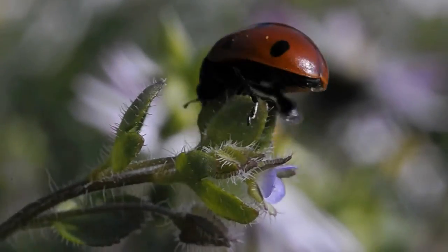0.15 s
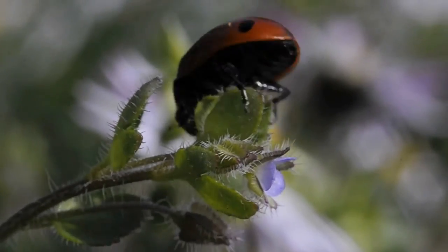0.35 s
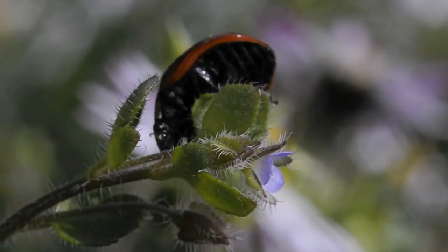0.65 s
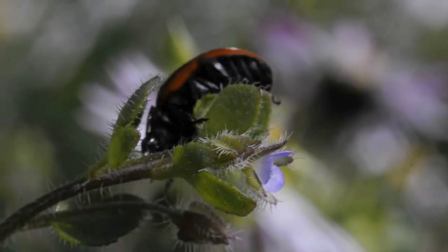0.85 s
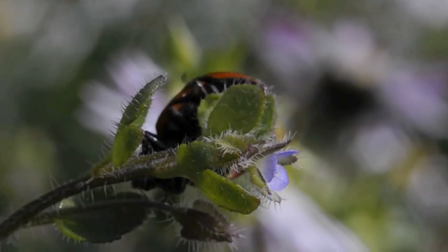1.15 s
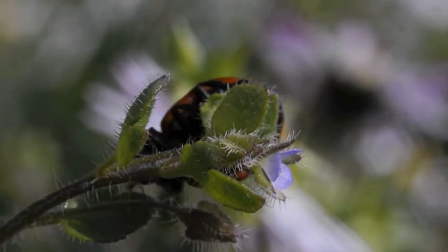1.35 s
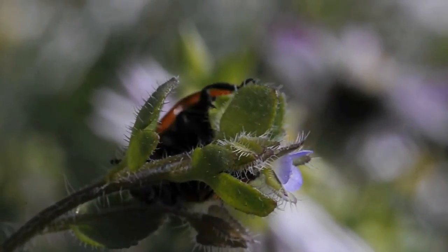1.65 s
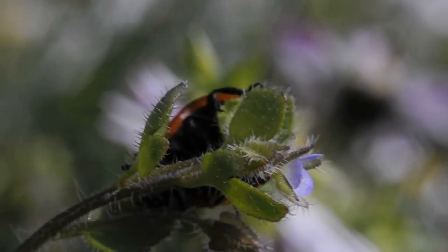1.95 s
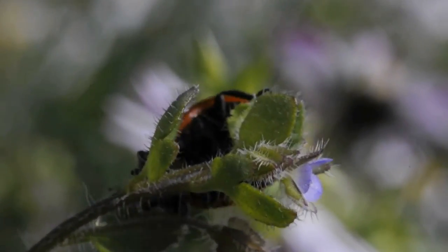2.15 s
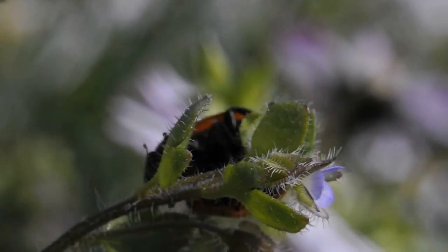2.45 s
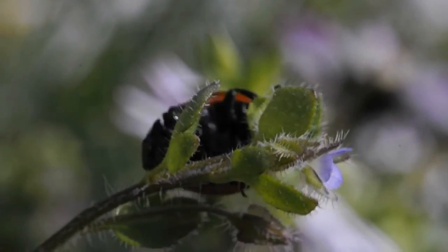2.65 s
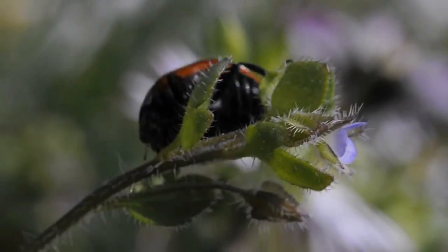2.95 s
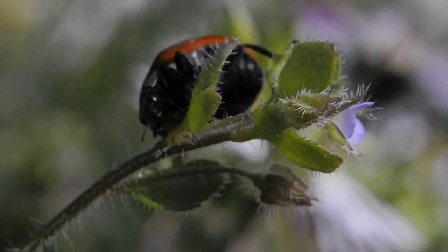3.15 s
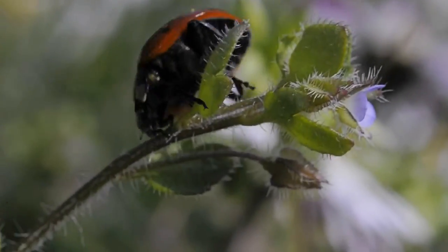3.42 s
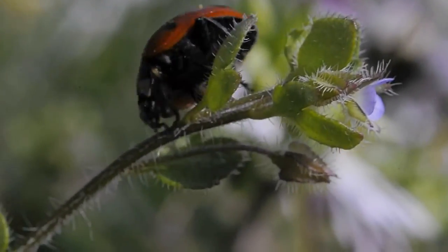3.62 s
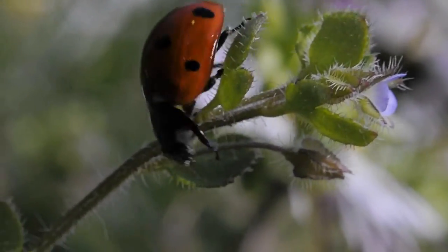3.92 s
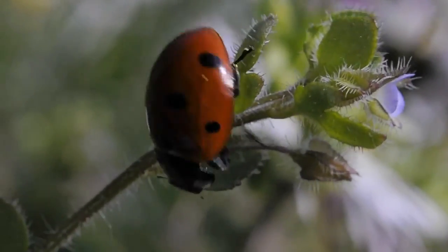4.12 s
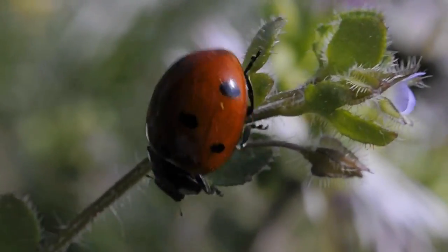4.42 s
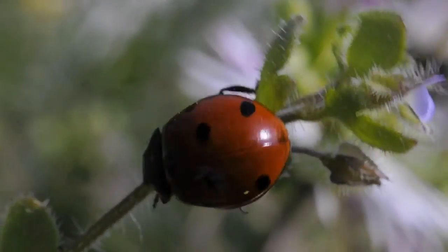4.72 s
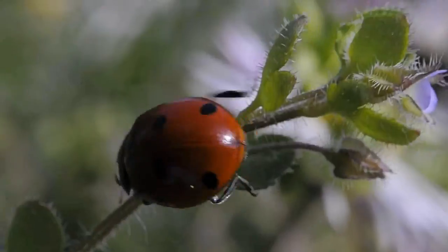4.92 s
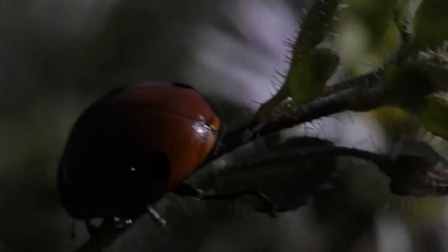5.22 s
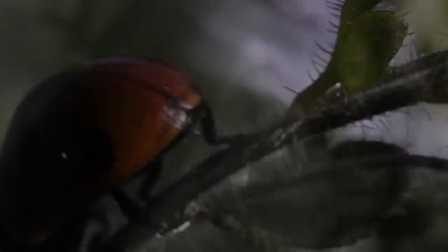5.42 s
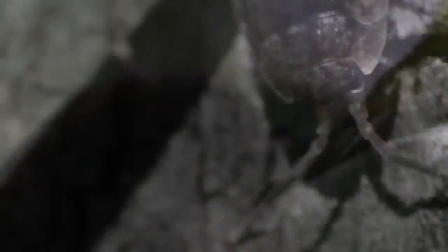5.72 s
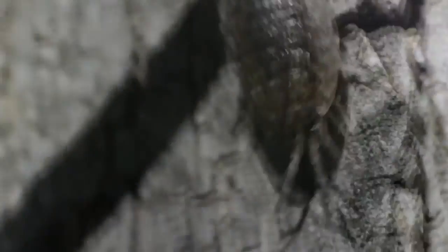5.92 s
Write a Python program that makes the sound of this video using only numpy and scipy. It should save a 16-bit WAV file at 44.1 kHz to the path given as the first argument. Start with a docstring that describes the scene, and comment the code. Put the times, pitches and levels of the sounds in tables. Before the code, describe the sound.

A soft, distant outdoor hush runs throughout, heard from one microphone among trees. At 0.5 seconds a single songbird starts with fluted, gliding whistles, echoing lightly off trunks and foliage. A sharp, dry snap sounds close by at 0.7 seconds. The bird slides upward through a buzzing slur around 0.9, gives a clear falling whistle at 1.2, then breaks into a thin, high twitter from 1.7 to 2.3, with small snaps near its end. The second phrase begins at 2.8 seconds: short whistles, a louder climbing warble from 3.2 to 3.5, more whistles until 4.2, then a quick, slightly raspy trill around 4.4 and twittering until 4.9. Faint, grainy rustles of vegetation come and go nearby, with a dull snap at about 4.1. One faint rising note follows at 5.3 seconds, and a last snap at 5.8.

```python
"""One microphone among trees, over a soft, distant hush. Half a second in, a songbird starts with
fluted whistles, thrown back by trunks and foliage; small snaps and rustles come and go close by.
The first phrase runs through a buzzing slur to a thin twitter, sung with both sides of the syrinx.
Near 2.8 s the second begins: whistles, a climbing warble, more whistles, then a quick trill and
twitter. One faint rising note and a last snap follow."""
import sys
import numpy as np
from scipy import signal
from scipy.fft import rfft, irfft
from scipy.io import wavfile
from scipy.ndimage import uniform_filter1d

SR = 44100
rng = np.random.default_rng(int(sys.argv[2]) if len(sys.argv) > 2 else 0)


def put_to_file(sound):
    """Save the sound as 16-bit audio at rate SR, in the file named by the first command-line argument."""
    columns = np.atleast_2d(sound).T  # one column per channel
    safe = np.clip(columns, -1, 1)
    whole_steps = np.round(safe * 32767)
    wavfile.write(sys.argv[1], SR, whole_steps.astype(np.int16))


N = 267687

# spectrum of the distant wash: (frequency [Hz], relative level [dB])
HUSH_SPECTRUM = [(18, -46), (30, -23.5), (75, -20.5), (263, -16.5), (324, -8.5), (359, -10.5), (410, -6.5),
                 (787, 0), (1770, -7), (2130, -9.5), (15500, -15.5)]
# fluted notes: (time [s], length [s], pitch [Hz], drift [share of pitch], scoop [share of pitch],
# fall [share of pitch], fall time [s], level [dB], push before the fall [dB], overtone gain [dB])
WHISTLE_NOTES = [ (0.506, 0.092, 1870, -0.065, 0, 0.33, 0.015, -31, 5, -37),
                 (.589, 0.13, 1933, 0.095, .26, 0.203, 0.034, -25, -4, -38),
                 (1.212, 0.19, 2237, -.075, 0.13, .31, 0.026, -20.5, -0.5, -39),
                 (1.393, 0.18, 1447, 0.058, -.09, -0.055, 0.017, -42, 5, -22),
                 (2.767, 0.079, 1655, 0.047, 0, 0.107, 0.0177, -34, 2, -30.5),
                 (2.824, 0.047, 1460, -0.07, -0.061, -0.0057, 0.018, -31.5, 8, -42),
                 (2.855, 0.11, 1440, -0.0018, 0, 0.02, 0.019, -44.5, -10, -19),
                 (2.966, 0.031, 1394, -0.069, 0.014, 0.053, 0.01, -30, 2.5, -36),
                 (3.066, 0.073, 2030, 0.042, .2, 0.15, 0.012, -23.5, 2.5, -36.5),
                 (3.744, 0.046, 1628, -0.046, 0, 0.18, 0.0073, -40.5, 5, -19.5),
                 (3.764, 0.091, 2433, -0.053, -0.038, 0.18, 0.016, -31.5, -2, -24.5),
                 (3.84, 0.067, 1640, 0, 0.012, -0.064, 0.0075, -27, 3, -32.5),
                 (3.962, 0.17, 1769, 0.1, -0.085, -0.17, 0.033, -26, 1.5, -32.5),
                 (4.115, 0.1047, 2586, -.015, 0.3, 0.11, 0.0084, -24, 8, -29.5),
                 (5.256, .055, 2910, 0.48, 0.047, -0.041, 0.019, -45, 3, -40), ]
# how the beak colours the overtones: (frequency [Hz], gain [dB])
BEAK_RESPONSE = [(3000, 13), (4000, 6), (5200, 2.5), (6600, 3), (7500, -12), (8500, 7), (9300, -4),
                 (10400, 8), (11700, 1), (13000, -5), (16000, -9)]
# scatter from the foliage: (frequency [Hz], time to fall 60 dB [s])
FOLIAGE_DECAY = [(500, 0.17), (2000, 0.59), (4000, 0.57), (8000, 0.22), (14000, 0.033)]
# snaps near the microphone: (time [s], peak level [dB], treble tilt [dB])
NEAR_SNAPS = [(.7105, -5.5, 16.5), (.906, -23.5, -31), (.924, -23.5, -23), (2.193, -16, 39),
              (2.238, -22.5, 20), (4.146, -25, -17), (5.228, -36, 16), (5.842, -19.5, 26)]
# spectrum of a snap before its tilt: (frequency [Hz], relative level [dB])
SNAP_SPECTRUM = [(100, -41), (380, -19), (550, 9.5), (800, 14.5), (1200, 9.5), (2400, -3), (3500, -3),
                 (5000, -12.5), (15500, -19.5)]
# nearby rustling: (peak time [s], fade time [s], dull level [dB], crisp level [dB])
RUSTLE_SWELLS = [(0.717, 0.01, -55, -33.5), (.815, 0.075, -47, -39), (0.898, 0.037, -38, -47.5),
                 (1.3, 0.17, -48, -48), (1.89, 0.04, -41.5, -61), (3.05, 0.15, -49, -47.5),
                 (3.421, .2, -52, -49), (4.152, 0.12, -39.5, -44), (4.5, 0.19, -60, -41.5),
                 (5.08, 0.45, -52.5, -70), (5.29, 0.21, -55, -50.5)]
# dull part of the rustle: (frequency [Hz], relative level [dB])
DULL_SPECTRUM = [(100, -33), (300, -8.5), (500, -4), (900, 1.5), (1500, -2), (3000, -7), (8000, -59)]
# crisp part of the rustle, also the twitter's rasp: (frequency [Hz], relative level [dB])
CRISP_SPECTRUM = [(300, -13), (1500, -5), (3500, 3), (5500, -3.5), (8000, -3), (11000, -2), (15500, -5.5)]
# course of the buzzing slur: (time [s], top pitch [Hz], level [dB])
BUZZ_CONTOUR = [(0.828, 2374, -20), (0.851, 2330, -20), (0.873, 2070, -17), (0.889, 2283, -25.5),
                (0.941, 2532, -24.5), (0.961, 3020, -22.5), (0.985, 3260, -27.5), (1.024, 3323, -22.5),
                (1.052, 3324, -37)]
# twitter, higher side of the syrinx:
# (time [s], length [s], rise time [s], first pitch [Hz], top pitch [Hz], level [dB], swell [dB])
UPSWEEP_NOTES = [ (1.734, 0.03, .015, 2670, 8800, -34.5, -1), (1.766, 0.02, 0.0084, 4730, 8230, -34.5, 12),
                 (1.787, 0.032, 0.0074, 4520, 7960, -34, 4), (1.814, 0.02, .008, 4700, 8000, -41, -5),
                 (1.897, 0.097, 0.016, 6000, 8280, -41.5, 2), (1.993, 0.073, 0.0093, 3820, 7890, -39.5, -5),
                 (2.11, 0.064, 0.0053, 8100, 8500, -41, 12), (2.18, 0.071, 0.011, 5450, 8270, -40, -4),
                 (4.639, 0.085, 0.023, 4720, 6370, -34, 2), (4.893, 0.038, 0.0077, 3870, 6550, -38.5, -4), ]
# twitter, lower side: (time [s], length [s], first pitch [Hz], last pitch [Hz], level [dB])
CHIP_NOTES = [ (1.749, 0.029, 2310, 3120, -35), (1.769, 0.028, 4264, 2870, -30),
              (1.791, 0.0192, 3850, 2856, -31.5), (1.803, 0.0145, 4170, 2990, -34),
              (1.904, .031, 4120, 3260, -27.5), (1.934, 0.014, 3990, 3335, -27.5),
              (1.951, 0.01, 3570, 3140, -30.5), (2.008, 0.024, 4026, 3220, -29),
              (2.035, 0.0226, 3900, 3190, -33), (4.353, .022, 4640, 2960, -31.5),
              (4.681, 0.043, 4300, 3600, -34.5), (4.707, 0.037, 3820, 3546, -23.5),
              (4.877, 0.037, 3600, 3890, -38.5), ]
# downstrokes of the trill: (time [s], level [dB], end pitch [Hz])
TRILL_STROKES = [(4.368, -23.5, 3980), (4.405, -21, 4080), (4.442, -22.5, 3960), (4.477, -21.5, 3990),
                 (4.514, -25, 3817), (4.550, -29.5, 3645)]

BAND_LIMIT_HZ = 15900


def amp(db):
    """Decibels to gain."""
    return 10 ** (np.asarray(db) / 20)


def unit(x):
    """Scales to an rms of one."""
    return x / np.sqrt(np.mean(x ** 2) + 1e-20)


def read(points, hz):
    """Reads a curve on a log-frequency axis."""
    f, value = np.transpose(points)
    return np.interp(np.log(hz + 1), np.log(f + 1), value)


def add(mix, start, sound):
    """Mixes a sound in at start seconds."""
    part = mix[max(round(start * SR), 0):][:len(sound)]
    part += sound[:len(part)]


def noise(spectrum):
    """Noise with the given spectrum and an rms of one."""
    gain = amp(read(spectrum, np.fft.rfftfreq(N, 1 / SR)))
    return unit(irfft(rfft(rng.standard_normal(N)) * gain, N))


def wander(n, rate):
    """A smooth random curve that changes about rate times a second."""
    steps = np.arange(n) * rate / SR
    count = int(steps[-1]) + 2
    return np.interp(steps, np.arange(count), rng.standard_normal(count))


def hush(wash_db=-46.5, hum_hz=335, hum_db=-69):
    """The bed of the place: a distant outdoor wash with a faint wavering hum."""
    hz = hum_hz * (1 + .04 * wander(N, 60))
    hum = np.sin(2 * np.pi * np.cumsum(hz) / SR) * (1 + .5 * wander(N, 20))
    return amp(wash_db) * noise(HUSH_SPECTRUM) + amp(hum_db) * unit(hum)


def note(length, attack_s=0.0077, release_s=0.0071, ends_db=-14):
    """Time axis of a long note, and its fade in and out in dB."""
    t = np.arange(0, length, 1 / SR)
    return t, ends_db * (np.exp(-t / attack_s) + np.exp((t - length) / release_s))


def syrinx(hz, db, overtone_db, slope_db, jitter=0.001, strain=0.0008):
    """The bird's voice as a complex signal: a nearly pure tone that fast sweeps make unsteady."""
    sweep = abs(np.gradient(np.log(hz))) * SR
    shake = np.minimum(strain * sweep, .05)
    hz = hz * (1 + jitter * wander(len(hz), 383) + shake * wander(len(hz), 2500))
    phase = 2 * np.pi * np.cumsum(hz) / SR
    tone = np.exp(1j * phase)
    odd_db = np.interp(hz, [1450, 1900], [-10, 0])  # low notes have weak odd overtones
    for k in range(2, 10):
        partial_db = overtone_db + slope_db * (k - 3) + odd_db * (k % 2) + read(BEAK_RESPONSE, k * hz)
        tone += amp(partial_db) * (k * hz < BAND_LIMIT_HZ) * np.exp(1j * k * phase)
    return tone * amp(db) * signal.windows.tukey(len(hz), min(200 / len(hz), 1))


def whistles(scoop_s=.009, off_pitch_db=-22):
    """Fluted glides: each scoops into its pitch, drifts and bends away, weaker while off pitch."""
    out = np.zeros(N)
    for start, length, hz, drift, scoop, fall, fall_s, db, push_db, overtone_db in WHISTLE_NOTES:
        t, fade_db = note(length)
        to_go = (length - t) / fall_s
        bend = drift * (t / length - .5) - scoop * np.exp(-t / scoop_s) - fall * np.exp(-to_go ** 2)
        push = np.exp(-(to_go - 2.2) ** 2)  # peaks 2.2 fall times before the end
        level_db = db + fade_db + push_db * push + off_pitch_db * abs(bend)
        add(out, start, syrinx(hz * (1 + bend), level_db, overtone_db, slope_db=1.4).real)
    return out


def trees(sound, scatter_db=-11, early_db=-17):
    """Early echoes from ground and trunks, and foliage scatter that dies sooner in the high treble."""
    taps = rng.standard_normal(SR) * (rng.random(SR) < 3000 / SR)  # about 3000 paths a second
    hz, t, bands = signal.stft(taps, SR, nperseg=256)
    decay = amp(-60 * t / read(FOLIAGE_DECAY, hz)[:, None])
    onset = 1 - np.exp(-t / 0.0009)
    tail = signal.istft(bands * decay * onset, SR, nperseg=256)[1]
    tail *= amp(scatter_db) / np.linalg.norm(tail)
    for delay_s in (.019, .034, .066):
        tail[round(delay_s * rng.uniform(.95, 1.05) * SR)] += amp(early_db) * rng.choice([-1, 1])
    return signal.fftconvolve(sound, tail)[:N]


def snaps():
    """Dry clicks near the microphone, sharp at the front and with no ring."""
    out, hz = np.zeros(N), abs(np.fft.fftfreq(2048, 1 / SR))
    for start, db, treble_db in NEAR_SNAPS:
        log_gain = np.log(amp(read(SNAP_SPECTRUM, hz) + treble_db * hz / (hz + 3000)))
        click = np.fft.ifft(np.exp(np.conj(signal.hilbert(log_gain)))).real  # minimum phase
        add(out, start, amp(db) * click / abs(click).max())
    return out


def rustle(rise_share=0.46, dull_grain_db=4.0, crisp_grain_db=3.3):
    """Soft, grainy swells of noise close by, dull and crisp, that rise faster than they fade."""
    t, dull, crisp = np.arange(N) / SR, np.zeros(N), np.zeros(N)
    for peak_s, fade_s, dull_db, crisp_db in RUSTLE_SWELLS:
        swell = np.exp(-np.maximum(t - peak_s, (peak_s - t) / rise_share) / fade_s)
        dull += amp(dull_db) * swell
        crisp += amp(crisp_db) * swell
    grain = wander(N, 300)
    dull *= noise(DULL_SPECTRUM) * unit(amp(dull_grain_db * grain))
    crisp *= noise(CRISP_SPECTRUM) * unit(amp(crisp_grain_db * grain))
    return dull + crisp


def arches(hz, db, rate, depth, overtone_db, slope_db, lean=.85, dip_db=5):
    """The pitch swings in round-topped arches; tone and overtones weaken in the dips between them."""
    cycle = np.cumsum(rate) / SR % 1
    dip = (1 - np.sin(np.pi * cycle ** lean)) ** 1.4
    drop = depth * uniform_filter1d(dip, size=120)  # share of the pitch
    weaken_db = dip_db * drop / (drop.max() + 1e-9)
    return syrinx(hz * (1 - drop), db - .5 * weaken_db, overtone_db - weaken_db, slope_db, 0.0033).real


def buzz(flutter_hz=100, deepest_at_s=.917, width_s=0.031):
    """The first phrase's slur: it grows richer as it rises, and its fast flutter deepens midway."""
    out = np.zeros(N)
    times, pitches, levels = np.transpose(BUZZ_CONTOUR)
    t, fade_db = note(times[-1] - times[0])
    t = t + times[0]
    hz, db = np.interp(t, times, pitches), np.interp(t, times, levels) + fade_db
    depth = 0.48 * np.exp(-((t - deepest_at_s) / width_s) ** 2)
    overtone_db = np.linspace(-58, -25, len(t))
    add(out, times[0], arches(hz, db, np.full(len(t), flutter_hz), depth, overtone_db, slope_db=-11.5))
    return out


def upsweeps(sag_per_s=.55):
    """Higher side of the syrinx: thin notes that shoot up to a top pitch and sag from there."""
    out = np.zeros(N, complex)
    for start, length, rise_s, first_hz, top_hz, db, swell_db in UPSWEEP_NOTES:
        t = np.arange(0, length, 1 / SR)
        level_db = db + swell_db * (t / length - .5)
        hz = (top_hz + (first_hz - top_hz) * np.exp(-(t / rise_s) ** 2)) * (1 - sag_per_s * t)
        add(out, start, syrinx(hz, level_db, overtone_db=-26, slope_db=-13.5, jitter=0.0059))
    return out


def chips():
    """Lower side of the syrinx: short slides, each under one arch of loudness."""
    out = np.zeros(N, complex)
    for start, length, first_hz, last_hz, db in CHIP_NOTES:
        progress = np.arange(0, length, 1 / SR) / length
        hz = first_hz + (last_hz - first_hz) * progress ** 0.753  # slides fastest at the start
        tone = syrinx(hz, db, overtone_db=-23.5, slope_db=-13.0, jitter=.012, strain=0.0027)
        add(out, start, np.sin(np.pi * progress) * tone)
    return out


def twitter(sum_tone_db=-9):
    """Both sides of the syrinx at once: they make a tone at the sum of their pitches, and a rasp."""
    upper, lower = upsweeps(), chips()
    coupled = upper * lower / np.sqrt(abs(upper * lower) + 1e-12)
    rasp_db = np.interp(np.arange(N) / SR, [1.82, 1.9], [-6, -13])  # the first burst is the harshest
    rasp = amp(rasp_db) * abs(coupled) * noise(CRISP_SPECTRUM)
    flutter = unit(amp(2 * wander(N, 350)))
    return (upper * flutter + lower + amp(sum_tone_db) * coupled).real + rasp


def warble(start_s=3.229, length_s=0.26, settle_s=0.12, depth=.21):
    """The second phrase's warble climbs, growing louder and richer while its arches slow down."""
    out = np.zeros(N)
    t, fade_db = note(length_s)
    climb = np.tanh(t / settle_s)
    hz = np.interp(climb, [0, 1], [2083, 2786])
    db = np.interp(climb, [0, 1], [-26, -17.5]) + fade_db
    overtone_db = np.interp(climb, [0, 1], [-35, -27])
    arches_per_s = np.interp(t, [0, settle_s], [58, 32])
    add(out, start_s, arches(hz, db, arches_per_s, depth, overtone_db, slope_db=1.5))
    return out


def trill(stroke_s=0.0352, fall=.28, settle_s=0.0109, rasp_db=-16):
    """Fast downstrokes; the membranes also beat unevenly at half the pitch, adding a raspy comb."""
    out, t = np.zeros(N), np.arange(0, stroke_s, 1 / SR)
    envelope = abs(np.sin(np.pi * t / stroke_s)) ** 1.02
    for start, db, end_hz in TRILL_STROKES:
        hz = end_hz * (1 + fall * (np.exp(-t / settle_s) - np.exp(-stroke_s / settle_s)))
        phase = 2 * np.pi * np.cumsum(hz * (1 + .015 * wander(len(t), 2500))) / SR
        comb = sum(amp(-3.5 * (k - 3)) * np.sin(k * phase / 2) for k in range(3, 7))
        comb += amp(-1) * np.sin(phase / 2)
        rasp = amp(rasp_db) * comb * (1 + .8 * wander(len(t), 1800))
        add(out, start, amp(db) * envelope * (np.sin(phase) + rasp))
    return out


def scene(sway_hz=3):
    """What reaches the microphone: bird and snaps with their echoes, over rustle and distant hush."""
    song = whistles() + buzz() + warble() + twitter() + trill()
    clicks = snaps()
    into_trees = song + .5 * clicks
    sway = 2 * np.pi * sway_hz * np.arange(N) / SR  # the echoes drift between two sets of paths
    echoes = trees(into_trees * np.cos(sway)) + trees(into_trees * np.sin(sway))
    return (song + clicks + echoes + rustle() + hush())[None]


def record(dry, notch_hz=7900, notch_width_hz=300):
    """The mono microphone channel: a narrow dip in the treble, then a steep band limit."""
    dipped = signal.lfilter(*signal.iirnotch(notch_hz, notch_hz / notch_width_hz, SR), dry)
    lowpass = signal.firwin(511, BAND_LIMIT_HZ, window=("kaiser", 9), fs=SR)
    return signal.oaconvolve(dipped, lowpass[None], "same")


dry = scene()
out = record(dry)
put_to_file(out)
```